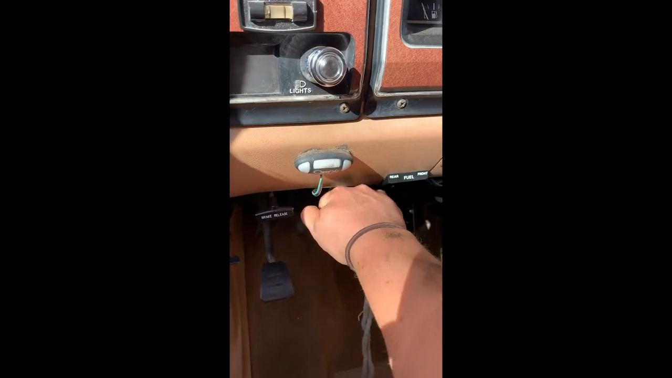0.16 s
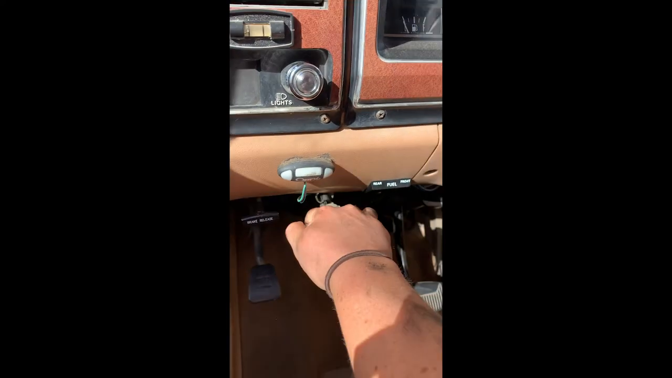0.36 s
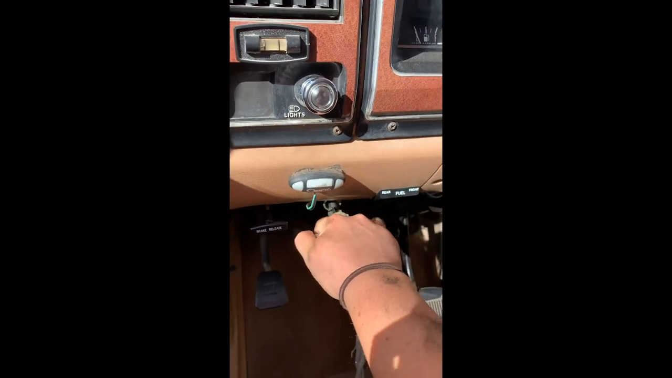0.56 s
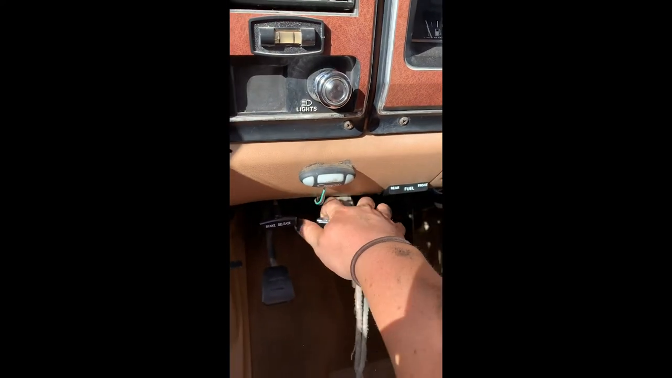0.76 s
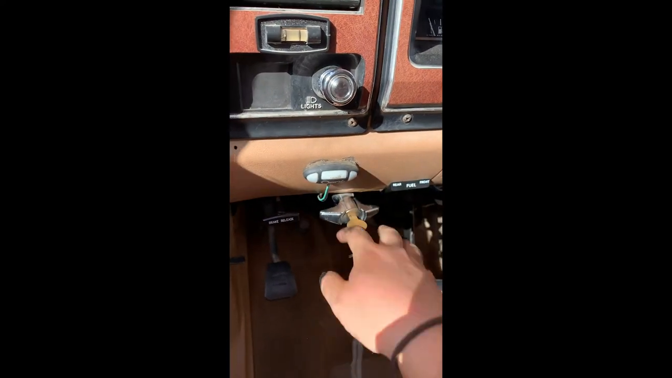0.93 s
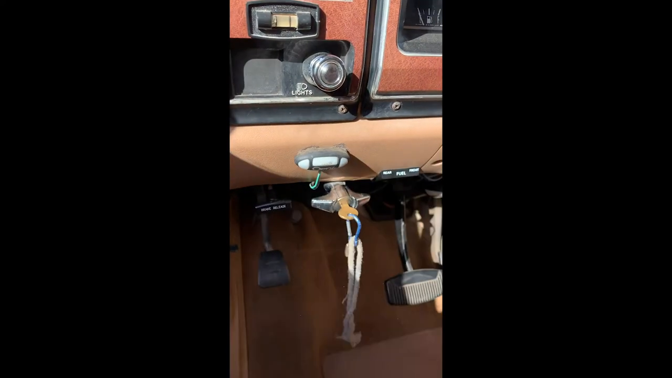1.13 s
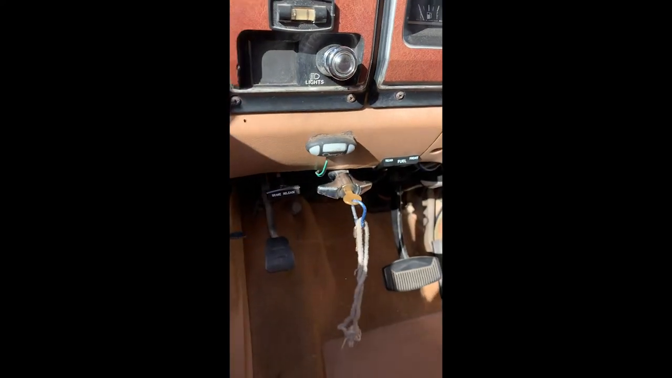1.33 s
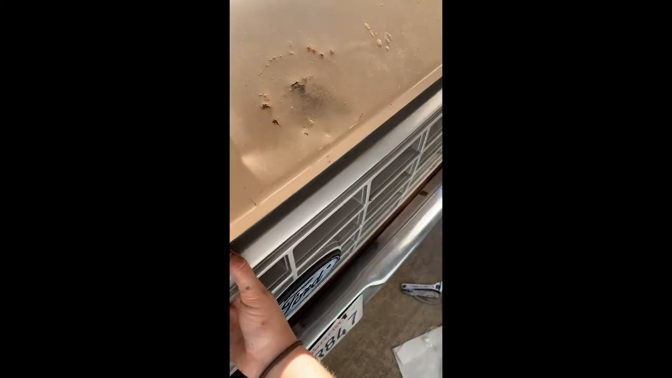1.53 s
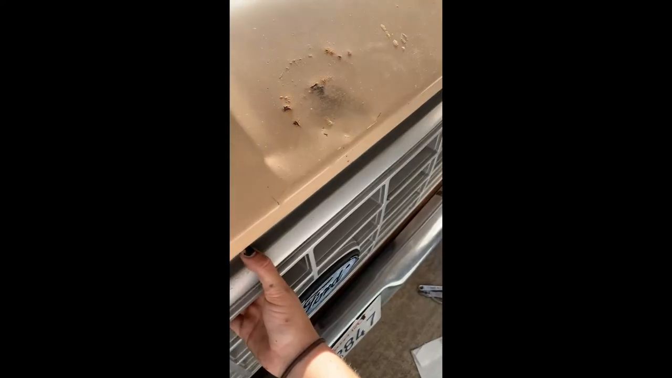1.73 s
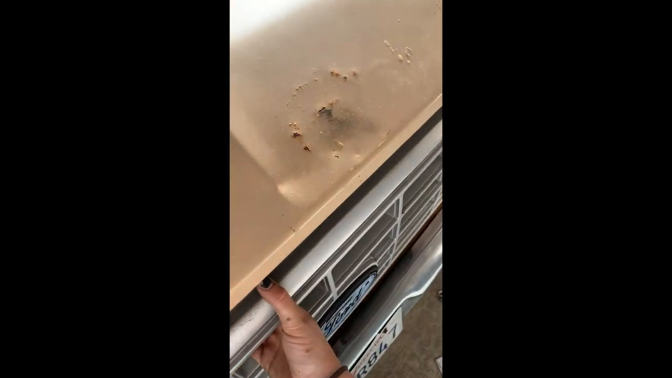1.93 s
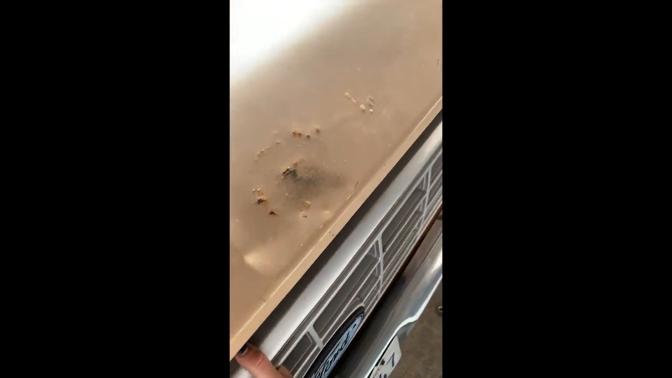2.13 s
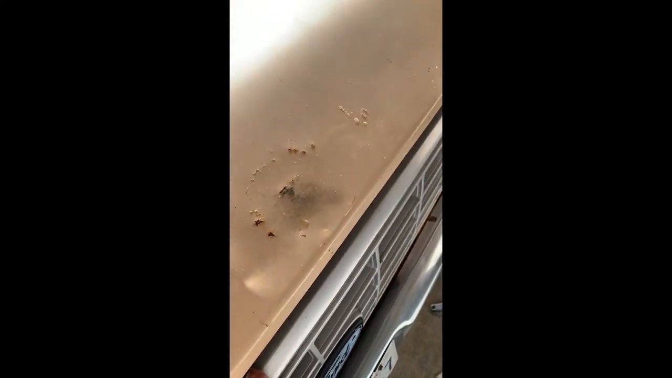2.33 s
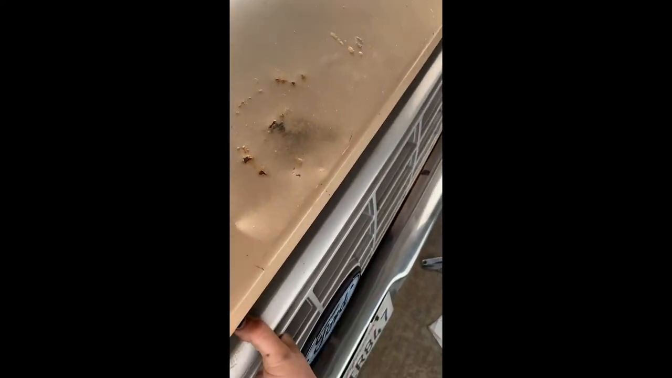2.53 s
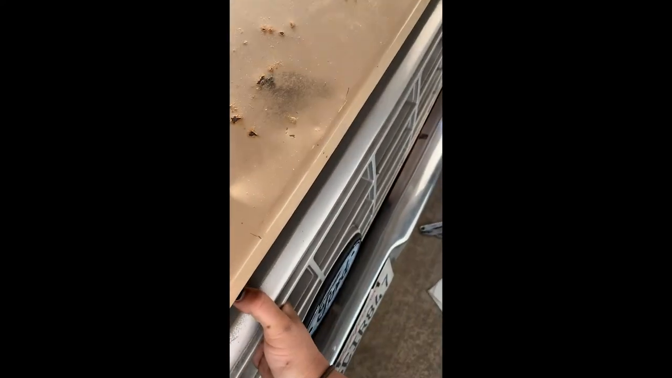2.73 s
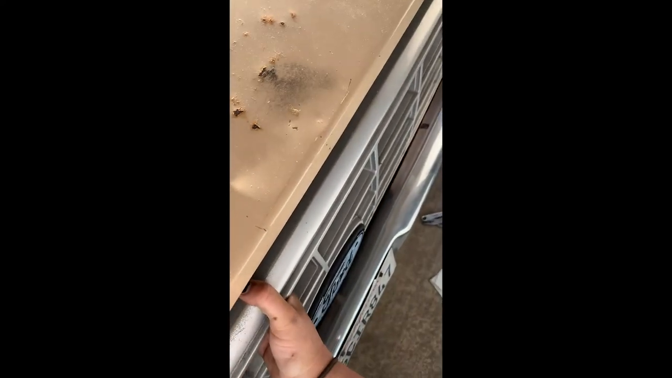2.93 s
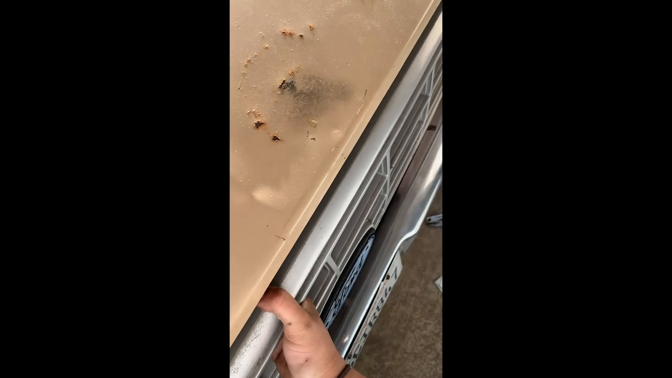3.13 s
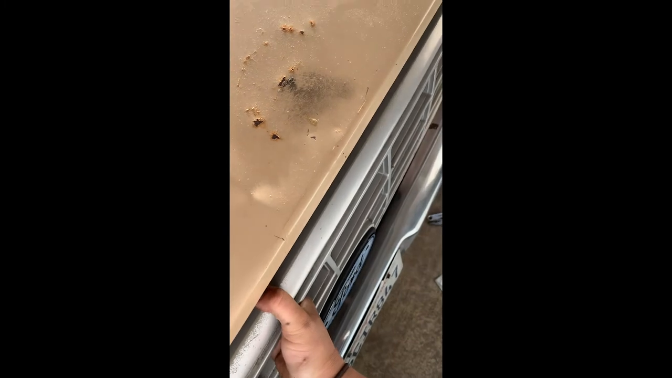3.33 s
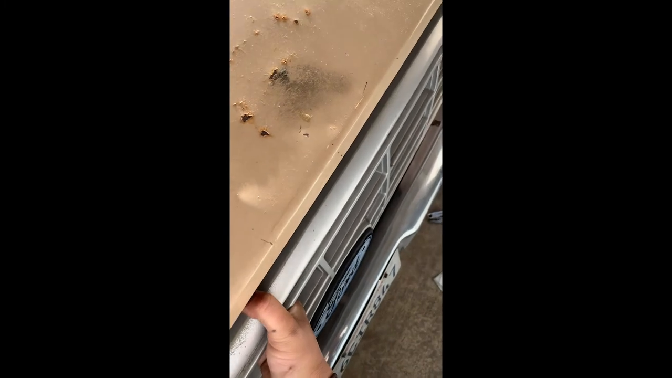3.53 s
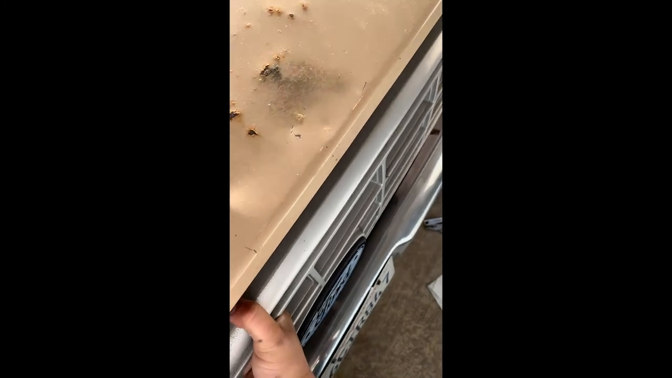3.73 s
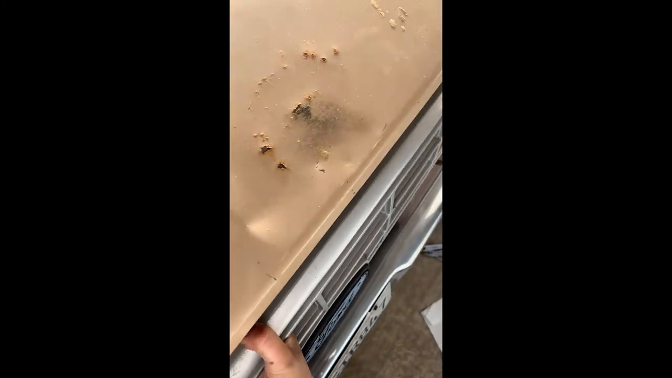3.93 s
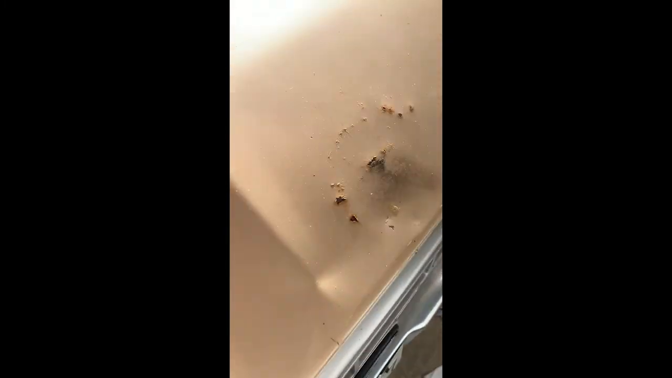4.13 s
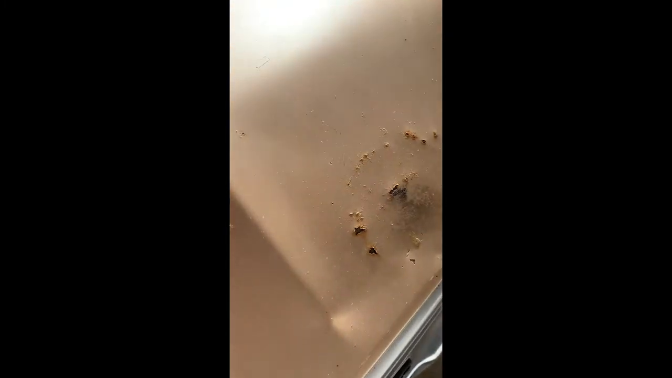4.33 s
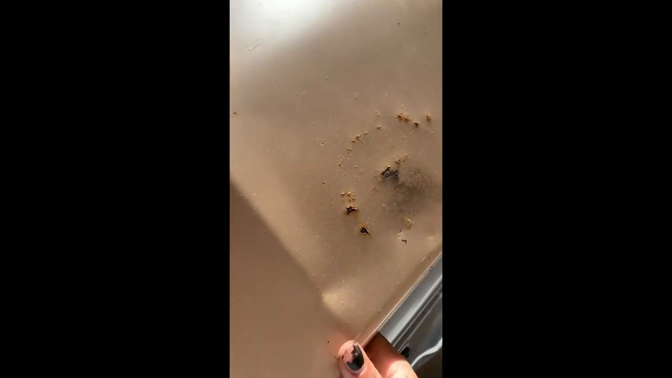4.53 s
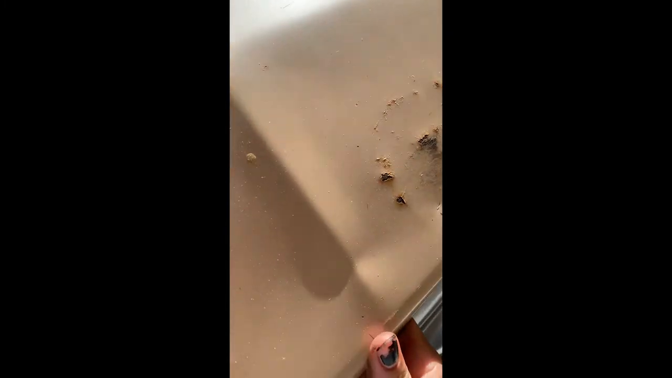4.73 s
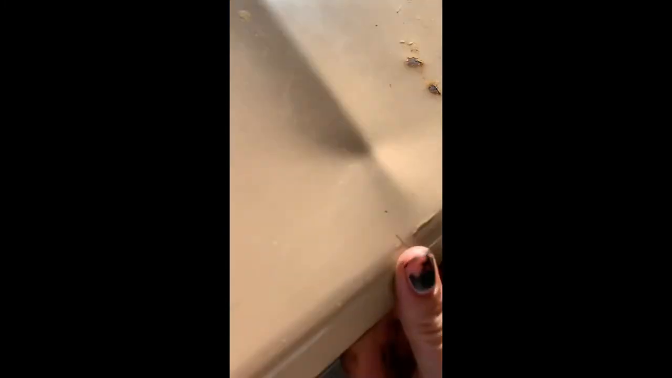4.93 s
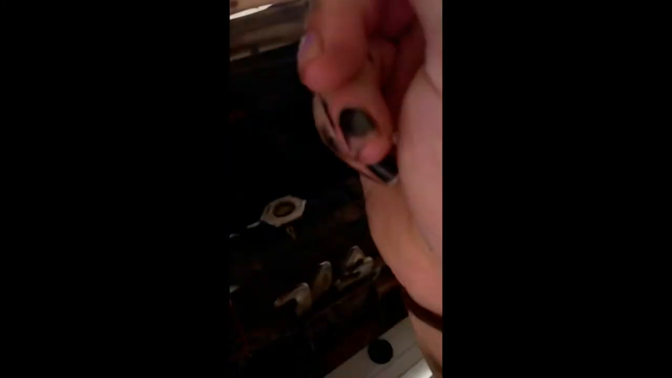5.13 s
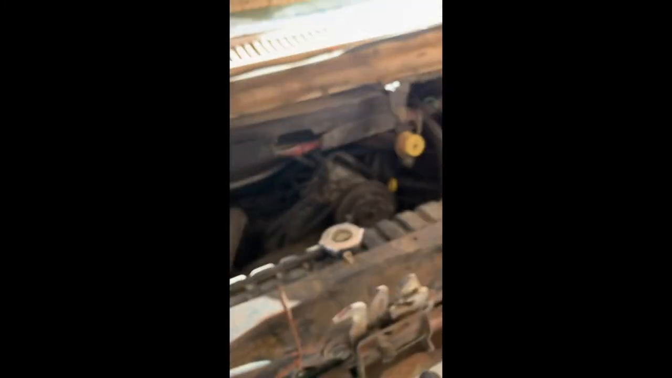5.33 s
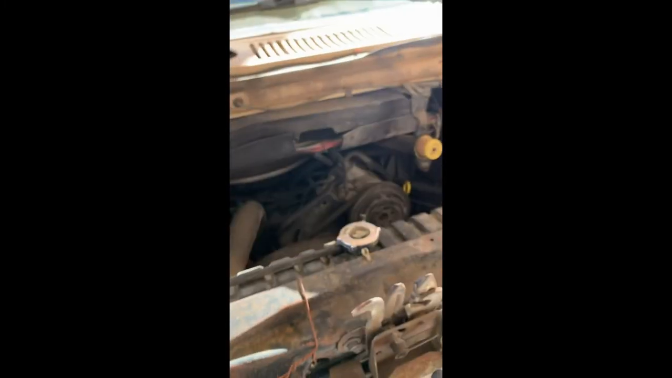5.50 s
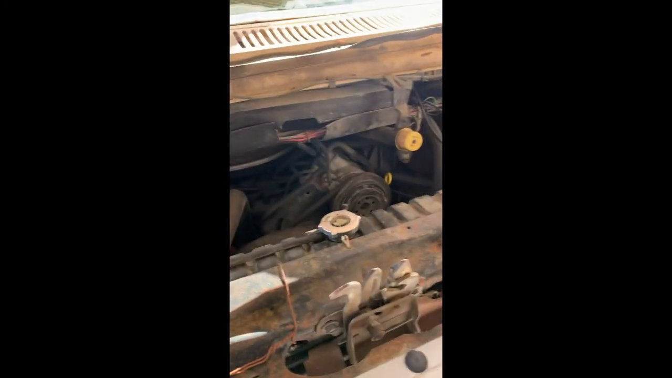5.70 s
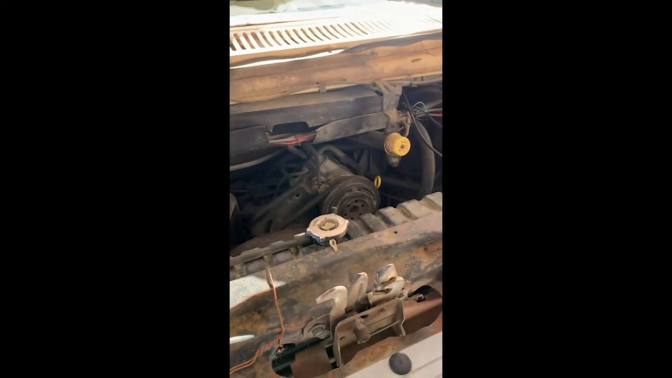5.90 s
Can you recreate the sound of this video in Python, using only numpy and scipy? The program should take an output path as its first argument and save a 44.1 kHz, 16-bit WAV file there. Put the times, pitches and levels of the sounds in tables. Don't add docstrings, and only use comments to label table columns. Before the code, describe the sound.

Close metallic scraping, a hard latch bang and lever snap, then hood knocks, a rattling safety catch, short squeal, low boom and hinge chatter.

```python
import sys
import numpy as np
from scipy import signal
from scipy.fft import rfft, irfft
from scipy.io import wavfile
from scipy.ndimage import uniform_filter1d

SR = 44100
rng = np.random.default_rng(int(sys.argv[2]) if len(sys.argv) > 2 else 0)


def field_ratio(decibels):
    return 10 ** (np.asarray(decibels, dtype=float) / 20)


def transcribe(u):
    v = np.clip(np.atleast_2d(u).T, -1, 1)
    q = np.round(v * 32767).astype(np.int16)
    wavfile.write(sys.argv[1], SR, q)


N = 262905
T = np.arange(N) / SR
CAB_ENDS_S, OUTSIDE_STARTS_S = 1.570, 1.592
SHARED_UNDER_HZ = 805
TOP_SLOPE = 2.7
EDGES = 25 * 2 ** np.arange(0, 9.4, 1 / 3)
CENTRES = np.sqrt(EDGES[1:] * EDGES[:-1])


def curve(rows, column, outside):
    rows = np.array(rows)
    return np.interp(T, rows[:, 0], rows[:, column], outside, outside)


def at_hz(points, hz):
    points = np.array(points)
    return np.interp(np.log(hz), np.log(points[:, 0]), points[:, 1])


def rms_one(x):
    return x / np.sqrt(np.mean(x ** 2, axis=-1, keepdims=True) + 1e-20)


def butter(x, order, hz, kind="low"):
    return signal.sosfilt(signal.butter(order, hz, kind, fs=SR, output="sos"), x)


def drift(rate):
    r = np.exp(-80 * np.pi * rate / SR)
    slow = signal.lfilter([1], [1, -2 * r, r * r], rng.standard_normal(N // 40 + 2002))[2000:]
    return np.interp(np.arange(N) / 40, np.arange(len(slow)), rms_one(slow))


def ring(x, hz, t60):
    r, w = field_ratio(-60 / (t60 * SR)), 2 * np.pi * hz / SR
    return signal.lfilter([0, np.sin(w)], [1, -2 * r * np.cos(w), r * r], x + 1e-18)


def bands(white):
    return [rms_one(butter(white[k % 2], 2, [low, high], "band"))
            for k, (low, high) in enumerate(zip(EDGES, EDGES[1:]))]


def coloured(noise, spectrum):
    lowest_hz = spectrum[0][0]
    return rms_one(sum(field_ratio(at_hz(spectrum, hz)) * np.sqrt(hz) * band
                       for hz, band in zip(CENTRES, noise) if hz > lowest_hz))


def stroke(start, peak, end, db):
    rise_db, fall_db = 26, 37
    before = rise_db * (peak - T) / max(peak - start, 1e-3)
    after = fall_db * (T - peak) / max(end - peak, 1e-3)
    return field_ratio(db - np.maximum(before, after))


def microphone_hiss(noise):
    # frequency in Hz, level in dB per Hz.
    self_noise = [(1500, -31.5), (2500, -21.5), (3900, 1), (5000, -7), (8000, -9), (11800, -9.5),
                  (12600, -37.5)]
    return field_ratio(-80) * butter(coloured(noise, self_noise), 10, 12000)


def shudder(column):
    # start in seconds, rumble in dB, rustle in dB, t60 in seconds.
    shudders = [
        (-.05, -55, -56.5, 0.73),
        (.39, -21.5, -37.5, 0.62),
        (.86, -39, -58.5, 0.65),
        (3.75, -60.5, -85, 1.15),
        (4.3, -67.5, -48, 1.9),
        (4.66, -31.5, -43.5, 1.22),
        (5.151, -46.5, -54, 2.4),
    ]
    gain = 0
    for row in shudders:
        since = np.maximum(T - row[0], 0)
        gain = gain + field_ratio(row[column] - 60 * since / row[3]) * (1 - np.exp(-since / 0.021))
    return gain


def traffic(noise):
    # time in seconds, traffic swell in dB.
    swell = [(0, -49), (.3, -47), (.9, -46.5), (1.5, -47), (1.7, -45.5), (2.4, -42), (2.6, -38.5),
             (2.9, -43.5), (3.5, -43.5), (4.0, -39.5), (4.3, -45.5), (5.0, -44), (5.4, -48.5), (5.6, -44),
             (5.96, -39)]
    # start in seconds, nearest in seconds, gone in seconds, level in dB.
    passes = [(1.399, 2.337, 2.66, -61), (2.205, 2.801, 4.53, -63), (2.604, 3.05, 3.5, -62.5),
              (5.205, 5.794, 6.5, -69)]
    # frequency in Hz, level in dB per Hz.
    rumble_colour = [(15, -46), (25, -19), (42, -2), (65, 7.5), (124, -0.5), (179, -12.5), (274, -16.5),
                     (307, -13), (322, -29), (352, -26.5), (500, -33.5), (650, -56), (1100, -120)]
    # frequency in Hz, level in dB per Hz.
    hiss_colour = [(150, -30.5), (250, -1.5), (302, -4), (325, -9), (473, -6), (700, -24.5), (909, -16.5),
                   (1040, -30), (1620, -19.5), (2300, -38), (3760, -33), (8000, -59.5), (10400, -87),
                   (17600, -120)]
    swell_db = curve(swell, 1, -48.0)
    rumble_gain = field_ratio(swell_db) + shudder(column=1)
    place_db = np.where(T < OUTSIDE_STARTS_S, -73.5, -64)
    wash_db = place_db + 0.2 * (swell_db - swell_db.mean())
    hiss_gain = field_ratio(wash_db) + sum(stroke(*car) for car in passes) + shudder(column=2)
    together, rumble, hiss = drift(1.3), 0, 0
    for hz, band in zip(CENTRES, noise):
        band = band[:, ::-1] * np.sqrt(hz)
        rumble_db = at_hz(rumble_colour, hz) + 1.2 * together + 1.8 * drift(6)
        hiss_db = at_hz(hiss_colour, hz) + 1.1 * together + 2.8 * drift(3) + 1.5 * drift(12)
        rumble = rumble + field_ratio(rumble_db) * band
        hiss = hiss + field_ratio(hiss_db) * band
    hiss_level = np.std(butter(hiss, 2, [400, 3000], "band"))
    return field_ratio(3.0) * rumble_gain * rms_one(rumble) + field_ratio(1.0) * hiss_gain * hiss / hiss_level


def hums():
    # frequency in Hz, width in Hz, level in dB.
    machines = [(55.4, 2.7, -55), (113.3, 8.8, -51), (290, 29, -64), (550, 3.9, -63.5)]
    # time in seconds, level in dB.
    whine = [(1.6, -4.5), (2.3, -3.5), (2.7, -5), (3.1, -5), (3.4, 5.5), (3.9, 5.5), (4.3, -11.5),
             (5.96, -8)]

    def hum(hz, width, db):
        return field_ratio(db) * rms_one(ring(rng.standard_normal(N), hz, 3.3 / width))

    out = hum(357, 8, -56.5) * (T < CAB_ENDS_S)
    for hz, width, db in machines:
        gain = 1 if hz < 450 else field_ratio(curve(whine, 1, -200))
        out = out + gain * hum(hz, width, db)
    return out


def sparrows():
    # start in seconds, length in seconds, head in Hz, tail in Hz, level in dB.
    chirps = [(1.202, 0.032, 3800, 3680, -66.5), (1.245, 0.038, 3700, 3560, -68),
              (1.291, .045, 3520, 3440, -71), (1.725, 0.14, 5090, 3796, -62),
              (2.082, 0.19, 5300, 3730, -63), (5.468, 0.15, 5290, 3686, -64.5),
              (5.811, 0.07, 4700, 4190, -62), (5.862, 0.076, 3900, 3600, -66)]
    # share of length, head share of pitch, level in dB.
    call = [(0, 0.26, -2), (.14, 1, -6), (.24, 0.61, 4), (.34, 0.05, 0.5), (.62, -.05, -2.5),
            (1, -0.13, -16)]
    share, height, shape_db = np.transpose(call)
    hz, gain = np.full(N, 4000.), np.zeros(N)
    burr = np.zeros(N)
    for s, length, head_hz, tail_hz, db in chirps:
        along = (T - s) / length
        sweep = head_hz / tail_hz
        hz = np.where(along > 0, tail_hz * sweep ** np.interp(along, share, height), hz)
        burr = np.where(along > 0, .028 + .13 * np.log(sweep), burr)
        gain += field_ratio(db + np.interp(along, share, shape_db, -200, -200))
    hz, gain = uniform_filter1d(hz, size=200), uniform_filter1d(gain, size=200)
    phase = 2 * np.pi * np.cumsum(hz * (1 + burr * drift(200))) / SR
    tone = gain * np.sin(phase) * field_ratio(6.0 * drift(60))
    echoes = rng.standard_normal((2, 6000)) * field_ratio(-60 * T[:6000] / .11)
    return field_ratio(-25) * np.array([signal.fftconvolve(tone, e)[:N] for e in echoes])


def wind_thumps():
    # time in seconds, level in dB, frequency in Hz, t60 in seconds.
    knocks = [(2.556, -27.5, 62.1, 0.088), (5.776, -20, 110.7, 0.064), (5.794, -13, 85, 0.051),
              (5.834, -19, 84, 0.062), (5.859, -27, 65.8, 0.33), (5.94, -29, 96.9, 0.15)]
    out = np.zeros(N)
    for s, db, hz, t60 in knocks:
        click = np.zeros(N)
        click[round(s * SR)] = field_ratio(db + 1.5)
        out += ring(click, hz, t60) - 0.44 * ring(click, 2.5 * hz, 0.52 * t60)
    return butter(out, 2, 420)


def finger_slides(noise):
    # start in seconds, peak in seconds, end in seconds, level in dB.
    touches = [(1.321, 1.394, 3.2, -72), (3.299, 3.449, 3.65, -65.5), (3.615, 3.654, 4.02, -62.5),
               (3.618, 3.719, 3.89, -69.5)]
    # frequency in Hz, level in dB per Hz.
    colour = [(1000, -5), (2500, -9), (3700, -2.5), (7000, -11.5), (12000, -22), (16000, -7.5)]
    gain = sum(stroke(*s) * ((T < CAB_ENDS_S) | (s[0] > CAB_ENDS_S)) for s in touches)
    gain = uniform_filter1d(gain, size=400)
    return field_ratio(8.5 + 1.5 * drift(30)) * gain * coloured(noise, colour)


def loose_parts():
    # time in seconds, frequency in Hz, level in dB, t60 in seconds.
    taps = [(.345, 3006, -49, .0055), (.372, 894, -24, .16), (.374, 1300, -31, .2), (.392, 110, -19, .1),
            (.851, 820, -31, .13), (.87, 270, -25, .08), (.872, 120, -22, .12), (.925, 105, -30, .15),
            (1.162, 1160, -62, .09), (1.17, 1620, -67, .088), (1.4955, 4150, -41, .005),
            (1.4965, 2300, -48, .0027), (1.4967, 2240, -42, .0073), (1.497, 958, -29, .023),
            (1.511, 930, -47, .014), (1.511, 2800, -54, .0038), (1.526, 920, -52, .016),
            (1.593, 4000, -51, .003), (2.319, 3850, -43, .009), (2.32, 1800, -48, .005),
            (2.32, 1100, -54, .0065), (3.645, 1160, -55, .15), (4.283, 2650, -36, .15),
            (4.32, 135, -32, .15), (4.345, 180, -36, .3), (4.352, 2500, -43, .12), (4.355, 4500, -34, .038),
            (4.36, 4000, -64, .6), (4.592, 760, -37, .06), (4.603, 350, -27, .08), (4.612, 6400, -40, .04),
            (4.646, 3050, -29, .12), (4.649, 4500, -23, .037), (4.69, 7030, -43, .22),
            (5.09, 1150, -43, .3), (5.222, 6400, -43, .02), (5.28, 1900, -59, .5),
            (5.8035, 3800, -47, .008), (5.859, 3650, -46, .019), (5.8585, 4100, -47, .006)]
    return sum(ring(field_ratio(db) * (np.arange(N) == round(s * SR)), hz, t60) for s, hz, db, t60 in taps)


def rubbing():
    # start in seconds, peak in seconds, end in seconds, peak in dB 1-4 kHz,
    # level over 4 kHz in dB re that.
    cable = [(.1, .24, 1, -50, -4), (.33, .358, 0.41, -40.5, -6), (.6, .665, 0.62, -52, -11),
             (.36, .4, 0.34, -43, -22), (.783, .795, 0.9, -43.5, -3.5), (.79, .854, 0.91, -29.5, -5)]
    # start in seconds, peak in seconds, end in seconds, peak in dB 1-4 kHz,
    # level over 4 kHz in dB re that.
    catch = [(3.718, 3.728, 3.88, -38.5, -9.5), (4.64, 4.65, 4.76, -29.5, -9),
             (5.07, 5.13, 5.5, -45.5, -23), (4.274, 4.284, 4.37, -21, -39), (4.15, 4.335, 4.36, -57, -30),
             (4.35, 4.45, 4.76, -50.5, -28), (4.585, 4.615, 5.4, -43.5, -32),
             (4.64, 4.655, 4.788, -20, -24), (4.66, 4.715, 4.74, -40, -8.5), (5.07, 5.15, 5.31, -45.5, -13),
             (5.15, 5.225, 5.7, -48, -18.5)]
    grains = field_ratio(3.0 * np.minimum(rng.exponential(1, (2, N)), 3.5)) * rng.choice([-1, 1], (2, N))
    grains = grains * (rng.random((2, N)) < 7000 * field_ratio(4.0 * drift(50)) / SR)
    strokes = []
    for rows, body_db in ((cable, 6), (catch, 8)):
        strokes += [(stroke(*r[:4]), r[4], body_db) for r in rows]
    out = np.zeros((2, N))
    for low, high, of_body, of_bright, trim_db in [
            (200, 1500, 0.49, 0.085, -4.0), (900, 2800, 0.094, 0.11, -1.5), (2480, 4000, 0.17, 0.41, -1.5),
            (4000, 7800, 0.0093, 0.99, -2.5), (8000, 21000, 0.0, TOP_SLOPE, -1.5)]:
        band = rms_one(butter(grains, 3, [low, high], "band"))
        gain = sum(g * field_ratio(of_body * body + of_bright * bright) for g, bright, body in strokes)
        out += field_ratio(trim_db) * uniform_filter1d(gain, size=300) * band
    return out


def panel_noise():
    spacing_hz, depth_db = 49.1, 4
    hz = np.fft.rfftfreq(N, 1 / SR)
    peaks = np.interp(hz / spacing_hz, np.arange(1000), rng.standard_normal(1000))
    return irfft(rfft(rng.standard_normal((2, 2, N))) * field_ratio(depth_db * peaks / (1 + (hz / 3500) ** 2)), N)


def clatter(panel, hits, thud_db, body_db):
    # frequency in Hz, decay time as a share of the blow's t60.
    ring_share = [(60, 3.1), (250, 2.45), (1000, 1.79), (4000, 0.62), (16000, 0.8)]
    out = np.zeros((2, N))
    colour_db = rng.normal(0, 2.7, (len(hits), len(CENTRES)))
    for (s, db, weight, crack, t60), tint in zip(hits, colour_db):
        i = round(s * SR)
        after = T[:min(SR // 2, N - i)]
        thud, body = weight + thud_db, weight + body_db
        shape = [(35, thud - 18), (110, thud - 7), (500, body - 7), (2000, -11.0),
                 (6500, crack - 5), (15000, TOP_SLOPE * crack - 6)]
        for hz, band, own_db in zip(CENTRES, panel, tint):
            ringing = max(t60, .01) * at_hz(ring_share, hz)
            snap = 0.92 * hz / (hz + 5000) * field_ratio(-60 * after / (0.23 * ringing))
            swell = 1 - np.exp(-after / (1.8 / hz + 0.042 * t60))
            fall = .5 * field_ratio(-60 * after / ringing) * swell + snap
            out[:, i:i + len(after)] += field_ratio(db + at_hz(shape, hz) + own_db) * fall * band[:, i:i + len(after)]
    return out


def struck(modes, blows):
    out, at = np.zeros((2, N)), [round(s * SR) for s, db in blows]
    blow_db = np.array(blows)[:, 1]
    for hz, level_db, t60 in modes:
        t60 = min(t60, .6, 150 / hz)
        twin = 1 + rng.choice([-1, 1]) * rng.uniform(.015, .05)
        for split, share in ((1, 1), (twin, .6)):
            clicks, sign = np.zeros((2, N)), rng.choice([-1, 1], (2, len(at)))
            heights = field_ratio(blow_db + level_db + rng.normal(0, 1.9, (2, len(at))))
            clicks[:, at] = heights * (sign if hz > SHARED_UNDER_HZ else sign[0])
            soft = signal.lfilter(np.hanning(int(SR / hz) + 3) * 2 * hz / SR, [1], clicks)
            out += share * ring(soft, hz * split, t60)
    return 2.33 * out


def cab_blows(panel):
    # time in seconds, peak in dB 1-4 kHz, weight of the lows in dB,
    # crack over 4 kHz in dB re peak, t60 in seconds.
    hits = [(0.1518, -37.5, -11, -24, 0.071), (0.170, -43, 13.5, -2.5, 0.13), (0.197, -40, 1, -3, 0.25),
            (0.2105, -46, -2, 0, 0.099), (0.2242, -39.5, 7, 4.5, 0.061), (0.2514, -33.5, -10, 2, 0.049),
            (0.2639, -25, -14.5, -1.5, 0.071), (0.2721, -19.5, -18, -1.5, 0.064),
            (0.3069, -28.5, -9.5, -2.5, 0.069), (0.3514, -39, -7.5, 2.5, 0.11),
            (0.3638, -12.5, -24, 2, 0.037), (0.367, -12, 2.5, -2.5, 0.14), (0.6096, -35, -8, -4.5, 0.057),
            (0.6418, -50.5, 2.5, -21, 0.6), (0.6623, -41, -6.5, -7.5, 0.061),
            (0.779, -42, -8.5, -9.5, 0.075), (0.785, -29, -7, -7, 0.13), (0.797, -31, -8, -5, 0.08),
            (0.8051, -24.5, -3, -1.5, 0.096), (0.831, -28.5, -4, -6, 0.099), (0.8458, -15.5, -21, 4, 0.037),
            (0.849, -18, -4.5, -1, 0.089), (0.904, -38.5, 9.5, -4, 0.073), (1.485, -46.5, 4, -26, 0.048)]
    # frequency in Hz, level in dB, t60 in seconds.
    dash = [(96.9, 2, 0.47), (199, -8, 0.16), (316.8, -18.5, 0.21), (380.6, -14.5, 0.78), (480, -25, 0.17),
            (526.6, -36, 0.7), (910, -17, 0.43), (862, -12.5, 0.43), (1210, -18.5, 0.2),
            (1520, -29.5, 0.16), (1552, -18, 0.15), (1833, -16.5, .09), (1973, -16, .12),
            (2220, -17.5, 0.083)]
    # time in seconds, level in dB.
    dash_blows = [
        (0.176, -39),
        (0.191, -34.5),
        (0.365, -18.5),
        (.385, -15.5),
    ]
    # frequency in Hz, level in dB, t60 in seconds.
    lever = [(96.9, -4.5, 0.36), (253, -11, 0.17), (344.7, 4, 0.13), (773, -9, 0.074), (880, -8, 0.14),
             (1295, -20.5, 0.14), (1772, -5.5, 0.0872), (2026, -3, 0.056), (2245, -18, 0.09),
             (2509, -14, 0.085), (2740, -18.5, 0.09), (3000, -20, .07), (3700, -13.5, .05)]
    # time in seconds, level in dB.
    lever_blows = [
        (0.787, -43),
        (0.798, -39.5),
        (0.808, -34.5),
        (0.821, -37),
        (.849, -21),
        (.872, -31),
    ]
    rings = struck(dash, dash_blows) + struck(lever, lever_blows)
    return clatter(panel, hits, thud_db=9.3, body_db=-5) + rings


def hood_blows(panel):
    # time in seconds, peak in dB 1-4 kHz, weight of the lows in dB,
    # crack over 4 kHz in dB re peak, t60 in seconds.
    hits = [(1.5918, -54, 5, -18, 0.17), (2.3176, -45, -19, -17, 0.17), (3.099, -49.5, -1, 3, 0.13),
            (3.5834, -57, 15, -3, 0.18), (3.722, -36.5, -11, 3, 0.067), (3.726, -31, 14, -8.5, 0.21),
            (3.737, -35.5, -3, -3, 0.15), (3.869, -63, -10, 1.5, 0.34), (4.172, -53, 9.5, -10.5, 0.26),
            (4.273, -26.5, 7, -18, 0.054), (4.279, -17, -3.5, -16.5, 0.2), (4.353, -25, -25, -10.5, 0.18),
            (4.589, -32, 13, -22, 0.16), (4.607, -28, -1, -12, 0.14), (4.6452, -20, -17, -4.5, 0.25),
            (4.6844, -16, -0.5, -10.5, 0.18), (5.074, -40, 7.5, -20, 0.094), (5.084, -40, 3, -37, 0.093),
            (5.0967, -30.5, -1, -18.5, 0.21), (5.123, -31, -8, -16, 0.24), (5.149, -34, -7, -10, 0.1),
            (5.155, -28, 0, -60, 0.13), (5.169, -47.5, -4.5, -39, 0.073), (5.204, -38, -7.5, -16, 0.12),
            (5.211, -36.5, 7, -17, 0.081), (5.2207, -28.5, -16, -8, 0.18), (5.805, -59, 17, -12, 0.12)]
    # frequency in Hz, level in dB, t60 in seconds.
    hood = [(124.8, -14, 0.9), (222.2, -8.5, 0.43), (312.6, -5.5, 0.31), (478.5, -2, 0.18), (525, -9, 0.5),
            (613, -16.5, 0.3), (703, -19.5, 0.32), (835, -22.5, .2), (906, -20.5, 0.2), (1097, -27, 0.51),
            (1590, -28, .13), (1750, -28, 0.36), (399.2, -10.5, 0.2), (2270, -24.5, 0.48)]
    # time in seconds, level in dB.
    hood_knocks = [
        (3.723, -16),
        (3.737, -26),
        (4.6, -33.5),
        (4.652, -28.5),
        (4.667, -23.5),
        (4.681, -26),
        (4.692, -26.5),
        (4.712, -32),
    ]
    # frequency in Hz, level in dB, t60 in seconds.
    catch = [(183.8, -11.5, 0.48), (489.4, -2.5, 0.13), (1063, -5, 0.2), (905, -6, 0.2), (292, -1, 0.09),
             (765, -22, 0.4), (1502, -4, 0.3), (1730, -0.5, 0.24), (1940, -8, 0.35), (2190, -0.5, 0.39),
             (2490, -6.5, 0.2), (2390, -4.5, 0.2), (3560, -19, .5), (4280, -7, 0.15)]
    # time in seconds, level in dB.
    catch_knocks = [
        (4.281, -24.5),
        (4.288, -27),
        (4.299, -25.5),
        (4.315, -31),
        (4.328, -31),
        (4.355, -38.5),
        (4.644, -28),
        (4.668, -27.5),
        (4.697, -33),
    ]
    # frequency in Hz, level in dB, t60 in seconds.
    hinge = [(252, -6, 0.14), (325, -1, .1), (492.5, 2.5, .12), (610, -13, .1), (755, -7.5, 0.076),
             (952, -9, 0.16), (1219, -3.5, .2), (1368, -9.5, .2), (1600, -11, .12), (2110, -20, .12),
             (2580, -24, .12)]
    # time in seconds, level in dB.
    hinge_touches = [(5.081, -44), (5.087, -42), (5.102, -36), (5.113, -47), (5.124, -41), (5.134, -37),
                     (5.146, -43), (5.156, -36), (5.168, -38), (5.185, -42), (5.21, -33.5), (5.221, -42),
                     (5.235, -51), (5.267, -47.5)]
    rings = struck(hood, hood_knocks) + struck(catch, catch_knocks) + struck(hinge, hinge_touches)
    return clatter(panel, hits, thud_db=-2, body_db=0.12) + rings


def catch_squeal():
    # time in seconds, slips per second, level in dB.
    slips = [(4.596, 960, -47), (4.609, 910, -30.5), (4.62, 935, -24.5), (4.627, 970, -32),
             (4.634, 955, -26.5), (4.640, 950, -33), (4.648, 1000, -25.5), (4.658, 1300, -48)]
    # frequency in Hz, level in dB.
    colour = [(900, -1.2), (1900, -7.5), (2900, -6.5), (4600, -22), (12000, -52)]
    phase = 2 * np.pi * np.cumsum(curve(slips, 1, 900) * (1 + .02 * drift(400))) / SR
    starts = rng.uniform(0, 2 * np.pi, 15)
    stack = np.zeros((2, N))
    for port in range(2):
        for k in range(1, 16):
            harmonic_db = at_hz(colour, k * slips[1][1]) + 7 * drift(220)
            stack[port] += field_ratio(harmonic_db) * np.sin(k * phase + starts[k - 1])
    return 1.202 * uniform_filter1d(field_ratio(curve(slips, 2, -200)), size=150) * stack


def hood_boom():
    attack_s, settle_s, hold_s, release_s = 0.015, 0.13, 0.16, 0.02
    s = 4.792 + np.cumsum([-attack_s, attack_s, settle_s, hold_s, release_s])
    db = np.interp(T, s, -31.5 - np.array([15, 0, 5, 5, 18]), -200, -200)
    return 2.67 * uniform_filter1d(field_ratio(db), size=900) * np.sin(2 * np.pi * 71.4 * T)


def scene():
    noise = bands(rng.standard_normal((2, 2, N)))
    background = microphone_hiss(noise) + traffic(noise) + hums() + sparrows()
    nearby = wind_thumps() + finger_slides(noise)
    panel = bands(panel_noise())
    metal = loose_parts() + rubbing() + cab_blows(panel) + hood_blows(panel) + catch_squeal() + hood_boom()
    return background + nearby + metal


def band_limit(x):
    return signal.sosfilt(signal.butter(12, 16980, fs=SR, output="sos"), x)


def record(dry):
    lag, mirrored_over_hz = 10, 3600
    dry = butter(dry, 4, 36, "high")
    dry = signal.lfilter(*signal.iirnotch(4930, 31, fs=SR), dry)
    low = butter(dry, 2, SHARED_UNDER_HZ)
    high = butter(dry[0], 4, mirrored_over_hz, "high")
    middle = butter(dry - low, 4, mirrored_over_hz)
    deep = butter(low[0], 1, 160)
    early_bass = np.roll(low[0] + (field_ratio(-3.5) - 1) * deep, -lag)
    right_bass = 0.88 * early_bass + 0.05 * low[1]
    right_treble = -0.019 * high - 0.9 * np.roll(high, lag)
    wet = np.array([low[0] + middle[0] + high, right_bass + 1.174 * middle[1] + right_treble])
    wet = signal.sosfilt(signal.cheby2(10, 60, 16300, fs=SR, output="sos"), wet)
    on = uniform_filter1d(1. * ((T < CAB_ENDS_S) | (T > OUTSIDE_STARTS_S)), size=60)
    return band_limit(field_ratio(-4.0) * wet * on)


dry = scene()
out = record(dry)
transcribe(out)
```